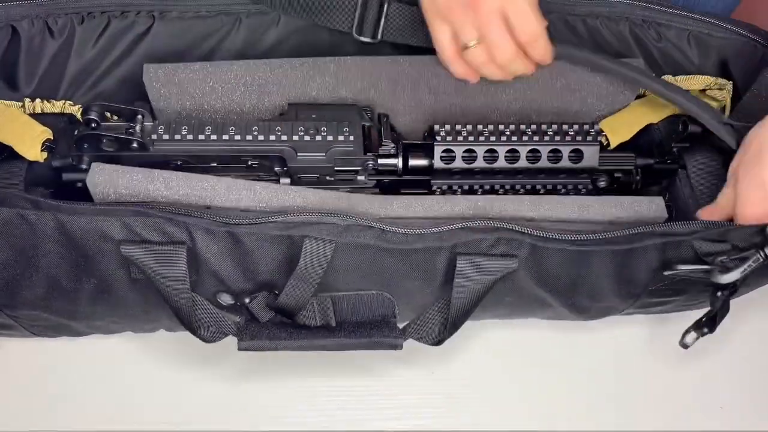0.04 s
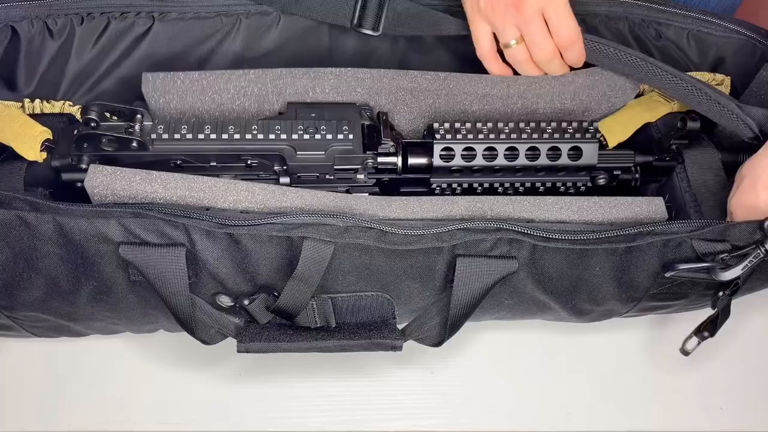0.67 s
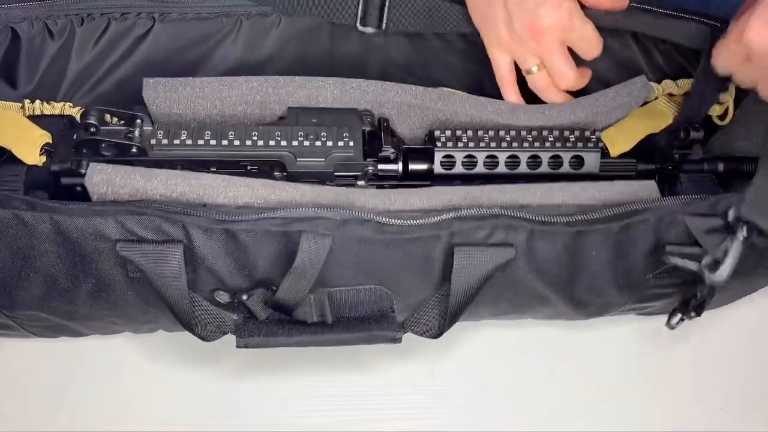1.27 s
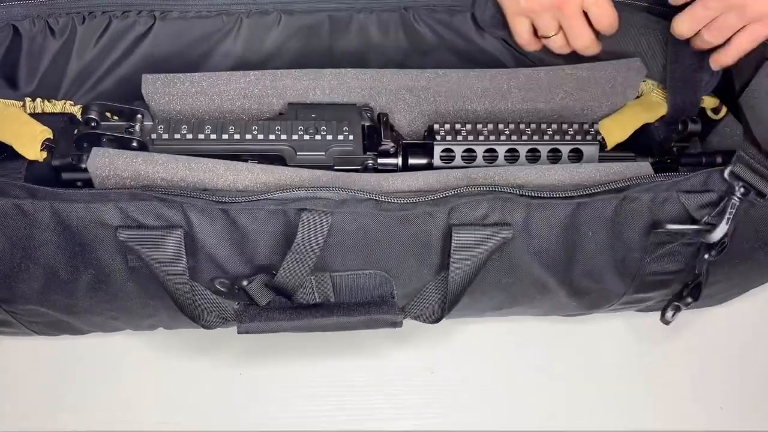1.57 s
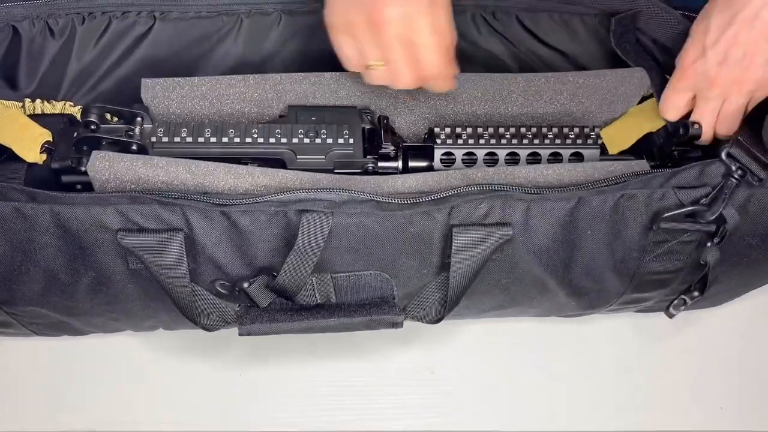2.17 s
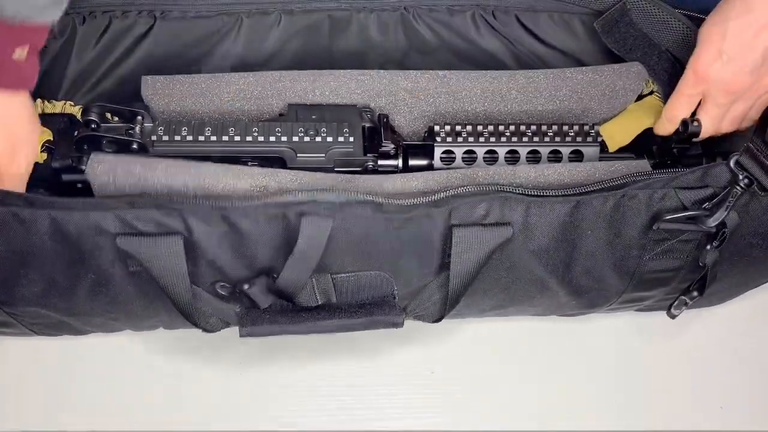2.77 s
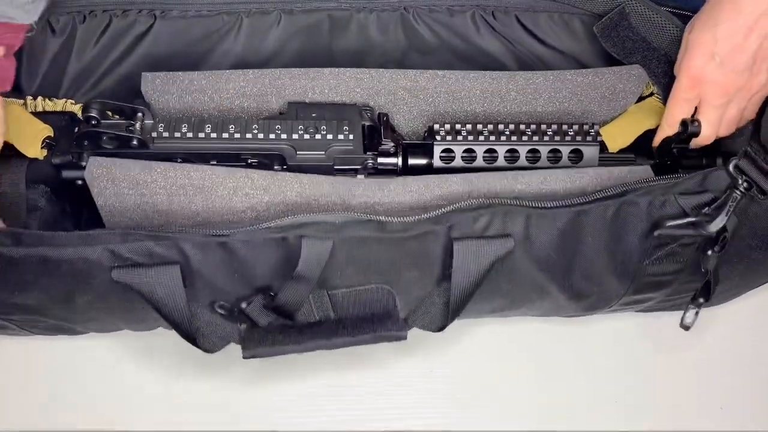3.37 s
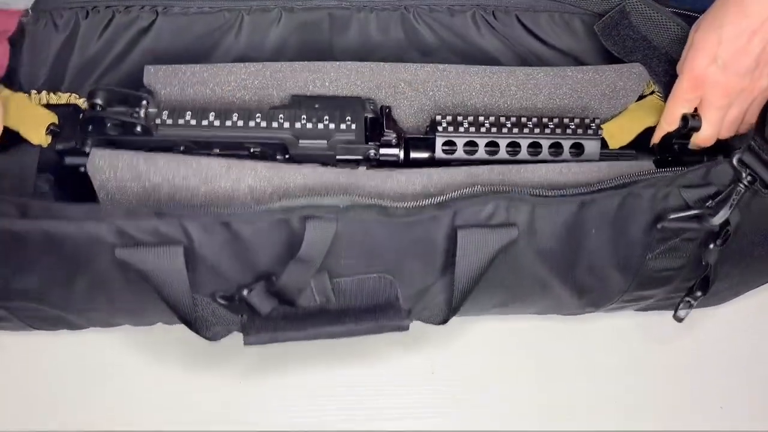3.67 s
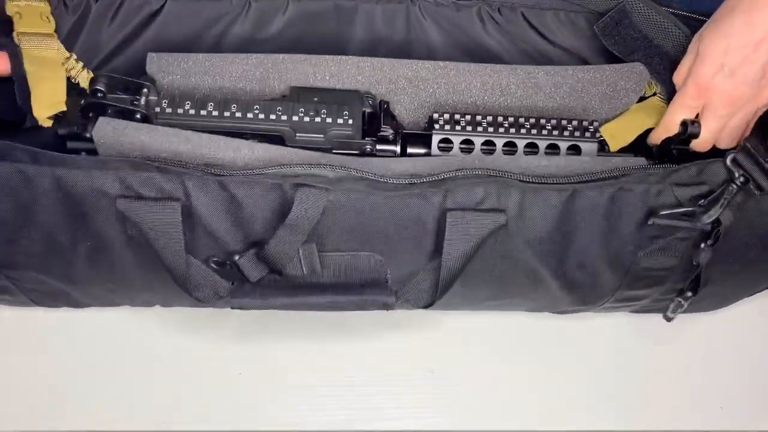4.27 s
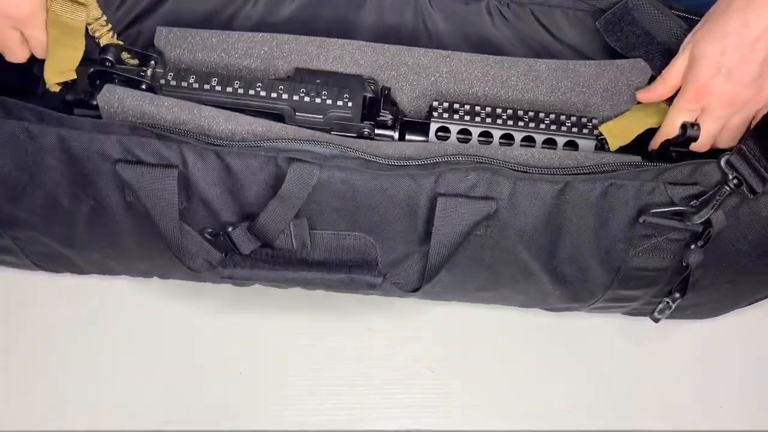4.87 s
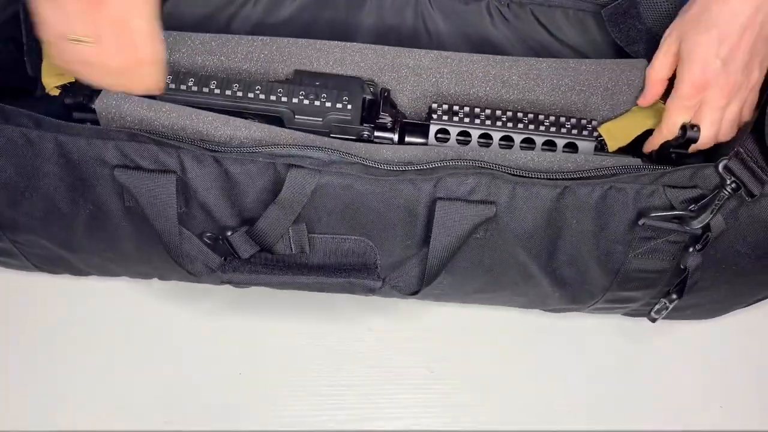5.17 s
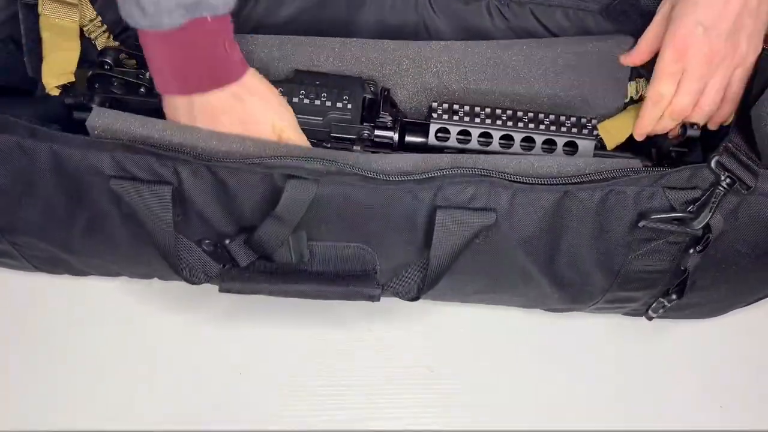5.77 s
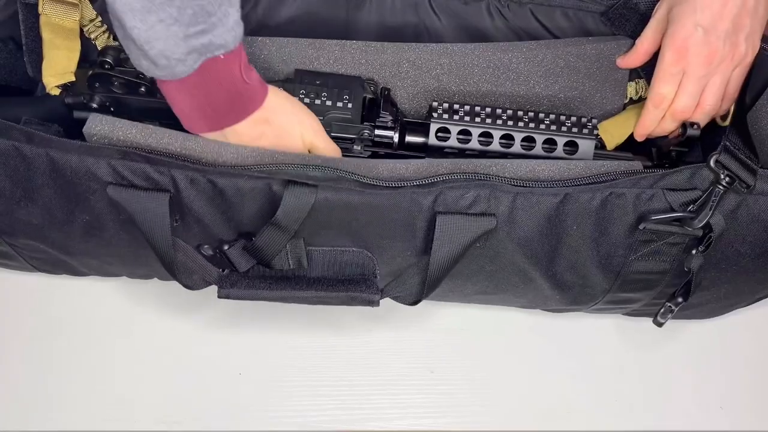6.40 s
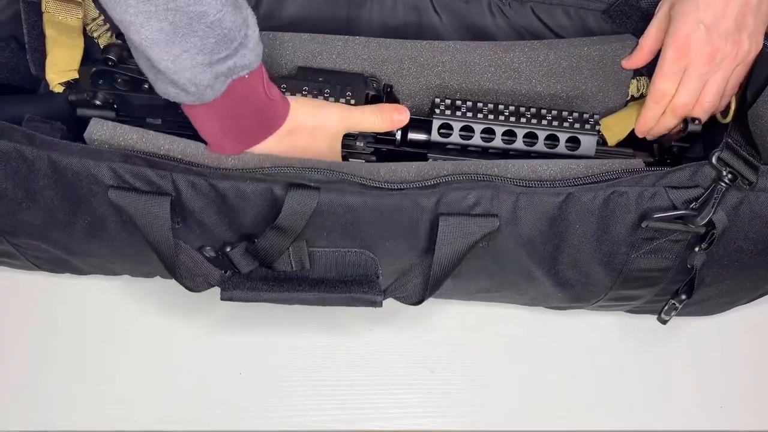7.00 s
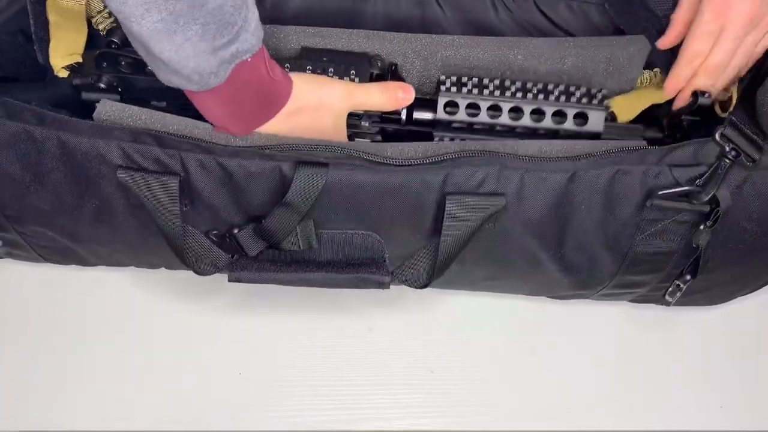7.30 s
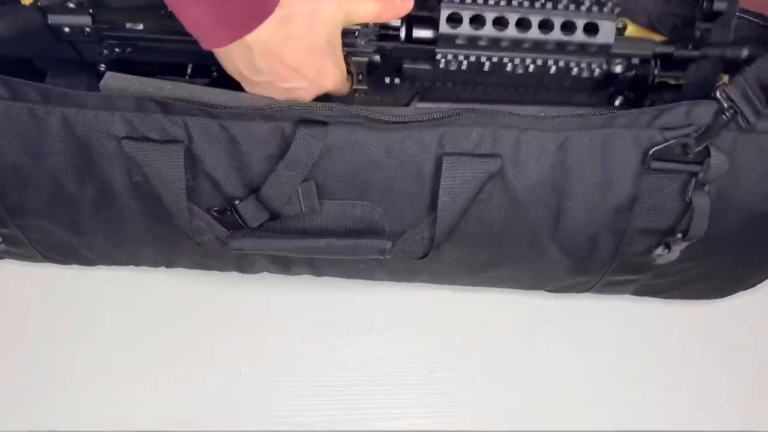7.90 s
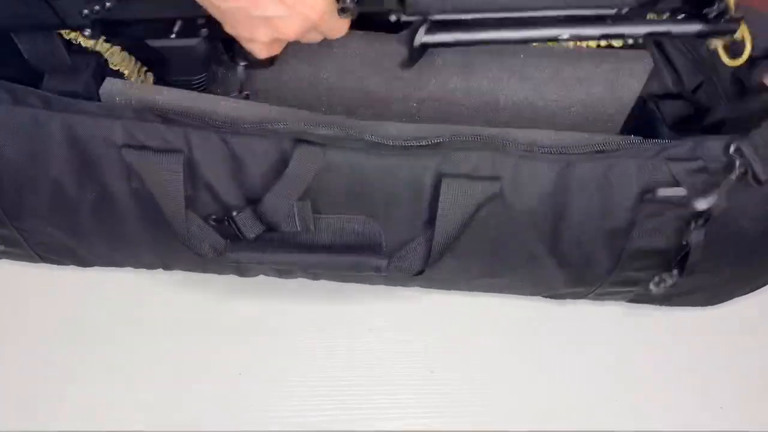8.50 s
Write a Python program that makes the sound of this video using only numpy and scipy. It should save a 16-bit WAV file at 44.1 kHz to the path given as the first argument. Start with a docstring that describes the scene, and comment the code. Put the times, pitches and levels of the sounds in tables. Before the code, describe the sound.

A hook-and-loop strap crackles and rips open inside a padded nylon bag. Hands rub over fabric and foam, and the bag thumps softly on a table. A second strap rips, trailing off in scattered snaps. Quieter rustling follows, then a heavy metal rifle knocks and scrapes as it slides out. The sound is close, in a small room with faint background hiss.

```python
"""Two hook-and-loop straps rip open on a padded nylon bag, close up on a table in a small room.
Swarms of hooks let go, plucking the taut tape and shaking the panel; stragglers snap one by one.
Around the rips, hands rub over nylon and foam, the bag thumps on the table, and a heavy metal item
knocks and slides out. Short reflections and the ring of the hollow bag sit behind, over faint room tone."""
import sys
import numpy as np
from scipy import signal
from scipy.fft import rfft, irfft, next_fast_len
from scipy.io import wavfile

SR = 44100
rng = np.random.default_rng(int(sys.argv[2]) if len(sys.argv) > 2 else 0)


def digitize_waveform(pressure):
    """Quantize a signal to 16-bit integers and store it at the path in sys.argv[1].

    Rows of a 2-D input are taken as channels; values are limited to [-1, 1].
    """
    field = np.atleast_2d(pressure).T
    bounded = np.clip(field, -1, 1)
    quanta = np.round(bounded * 32767).astype(np.int16)
    wavfile.write(sys.argv[1], SR, quanta)


N = 381465
T = np.arange(N) / SR

# Levels are fader settings ahead of each layer's trim and the master gain.
# EQ curves, each (frequency [Hz], gain [dB])
ROOM_TONE_EQ = [(25, -0.5), (60, 4.5), (250, -11), (1000, -25.5), (4000, -24), (16000, -18)]  # low rumble, faint hiss
PADDING_EQ = [(25, -38.5), (62, -9.5), (100, -9), (140, -5.5), (230, 2.5), (400, -3.5), (520, -11),
              (800, -38)]  # dull body of the foam
CLOTH_EQ = [(250, -18.5), (480, -14), (660, 0.5), (820, 1), (1000, 0), (1400, 0), (2100, -1.5),
            (2700, -10.5), (4500, -15)]  # midrange rustle
WEAVE_EQ = [(1200, -49), (2600, 1.5), (4000, 2), (5500, 6), (8000, 1), (11500, 4.5), (15500, 3.5)]  # fine hiss of threads
CRINKLE_EQ = [(1300, -27), (2400, 0), (3800, 4.5), (5000, -1.5), (7500, -13)]  # a snapping crease
TICK_EQ = [(3200, -54), (5400, 7.5), (6800, 7), (8200, 5), (11000, 11.5), (13000, 5), (15500, 8.5)]  # a single hook
PANEL_EQ = [(25, -34), (62, -4), (100, -18), (140, -1), (200, 4.5), (270, 9.5), (330, 4), (400, 6),
            (520, -22), (800, -39)]  # boom of the panel under a strap
TAPE_EQ = [(250, -12.5), (480, 2), (660, -3), (810, 2), (930, 1.5), (1250, 2.5), (1480, 3), (1750, 0.5),
           (2200, -1), (2700, -13), (4500, -8.5)]  # rasp of the stiff tape
HOOKS_EQ = [(1200, -27.5), (2600, -3), (3800, 2.5), (5600, 6.5), (7300, 2.5), (9000, 1.5), (11300, 5),
            (13000, 2.5), (15500, 3.5)]  # bright crackle of many hooks
# the hollow bag and the table ringing on: (frequency [Hz], level [dB], t60 [s])
HOLLOW_MODES = [(137.7, -5.5, 0.99), (260, -6, 0.1), (404.5, -1.5, 0.29), (819, 7.5, 0.23)]
# phase between the two microphone ports: (frequency [Hz], lead of the left [rad])
PORT_PHASE = [(0, 0), (1100, -.4), (2600, .6), (4700, 3.14), (17500, 22.0)]
# the padded bag bumping the table: (time [s], level [dB])
THUMP_CUES = [(0.837, -27), (1.816, -30), (2.01, -21.5), (2.503, -41), (3.138, -22), (3.437, -31),
              (3.612, -32.5), (5.271, -32), (6.042, -35.5), (6.62, -55), (7.345, -35), (7.4, -35),
              (7.612, -29), (7.815, -34), (7.908, -30), (7.961, -33), (8.031, -33), (8.12, -35),
              (8.21, -43), (8.26, -38), (8.334, -35), (8.438, -35), (8.54, -34)]
# buckles and the item hitting the padding and each other: (time [s], level [dB], brightness [Hz])
KNOCK_CUES = [(0.225, -16, 610), (0.556, -26.5, 324), (0.846, -18.5, 218), (1.112, -8.5, 335),
              (1.323, -8, 1310), (1.624, -17.5, 433), (1.66, -21, 292), (2.325, -24, 407), (2.78, -22, 715),
              (3.128, -23, 215), (3.208, -22.5, 243), (4.101, -33, 900), (4.122, -20, 297),
              (4.667, -15.5, 1040), (4.913, -29.5, 260), (5.266, -27, 435), (5.332, -30, 264),
              (5.628, -18, 1440), (5.698, -38, 1360), (5.994, -29.5, 1010), (6.538, -44.5, 1680),
              (7.348, -23.5, 300), (7.46, -32, 215), (7.583, -22.5, 544), (7.619, -24.5, 1230),
              (7.735, -24.5, 333), (7.813, -28, 205), (7.869, -25.5, 263), (7.874, -34, 1290),
              (7.96, -30.5, 254), (8.008, -26.5, 945), (8.05, -26.5, 237), (8.155, -21, 765),
              (8.202, -30.5, 242), (8.324, -28, 480), (8.459, -27, 305), (8.532, -29, 400)]
# ring of a knock: (frequency [Hz], level [dB], t60 [s])
HARDWARE_MODES = [(208.3, 1, 0.19), (277, 6, 0.086), (420, 3, 0.098), (646, 8, 0.032), (816, 3.5, 0.056),
                  (1007, 2.5, 0.1), (1256, -2, 0.06), (1412, 0, 0.063), (1900, 13.5, 0.02),
                  (2260, -11, 0.12)]
# a hand or the item stroking nylon and foam:
# (start [s], length [s], cloth level [dB], padding offset [dB], hiss offset [dB])
STROKE_CUES = [(-0.05, 0.076, -42, -1, 1.5), (0.025, 0.3, -41, -8.5, 1), (0.302, 0.51, -49, 0, 0.5),
               (0.468, 0.35, -46, -11, 5), (1.289, 0.23, -43, 1.5, 1), (1.53, 0.23, -36.5, -3.5, 6),
               (1.706, 0.27, -49.5, 0.5, 2), (1.952, 0.099, -48.5, 4.5, 4.5), (1.994, 0.25, -52, -4, -0.5),
               (2.189, 0.27, -48, -1.5, 0.5), (2.537, 0.066, -53, -3, -1), (2.635, 0.19, -47, -1.5, 6.5),
               (2.736, 0.11, -39.5, 0.5, -19), (2.799, 0.16, -47, -1, -1), (2.898, 0.41, -54.5, 1.5, -5),
               (3.097, 0.18, -39, -0.5, 4), (3.276, 0.27, -45.5, 1.5, 6), (3.454, 0.38, -36, -5, 10.5),
               (3.76, 0.23, -37.5, 5, 7.5), (3.913, 0.27, -44.5, 2, 6), (4.214, 0.021, -60, 8, 16.5),
               (4.296, 0.063, -53, 3, 10), (4.359, 0.35, -43.5, 1.5, 2), (4.581, 0.21, -40, 0, 1.5),
               (4.785, 0.23, -52, 0, 4), (4.938, 0.23, -57, -1, -10), (5.13, 0.5, -54, 3.5, -5),
               (5.303, 0.5, -49.5, -7, 3), (5.586, 0.21, -46.5, -9.5, -26), (5.72, 0.26, -55, 1, 1.5),
               (5.962, .15, -47, -3, -4.5), (6.123, 0.14, -52.5, -5.5, -5.5), (6.29, 0.16, -56, -1.5, -9.5),
               (6.668, 0.17, -55.5, -6, -4.5), (6.816, 0.19, -54, 4.5, -10.5),
               (7.005, 0.28, -47.5, 1.5, -16), (7.172, 0.36, -41.5, -1.5, 5.5),
               (7.385, 0.28, -45.5, -1, -4), (7.559, 0.12, -49, 3, 5.5), (7.674, 0.16, -48.5, 2.5, 0),
               (7.837, 0.15, -46, 0.5, 1.5), (7.913, 0.51, -42, 0, 0), (8.391, 0.19, -46, -1, -2),
               (8.532, 0.35, -44, -1.5, 1.5)]
# skin on smooth lining hisses finer than on coarse nylon: (time [s], top-octave gain [dB])
HISS_SHEEN = [(0, -3), (0.6, -3.5), (1.6, 0), (2.7, -2.5), (4.6, -3), (5.5, 8), (6.4, 13), (7.3, -0.5),
              (8.6, -5)]
# rubs through a fold or cupped hand: (start [s], length [s], level [dB], from [Hz], to [Hz])
POCKET_CUES = [(1.654, 0.079, -36, 690, 1060), (1.953, 0.042, -43, 720, 400), (6.809, 0.19, -51, 950, 1420),
               (6.975, 0.19, -50.5, 1470, 1200)]
# stretches where strained fabric ticks: (start [s], end [s], tick level [dB])
STRAIN_CUES = [(0.505, 0.7, -47), (2.2, 2.42, -41.5), (3.837, 4.15, -34), (4.349, 4.75, -44)]
# single hooks and creases snapping: (time [s], tick level [dB], crinkle offset [dB], tape offset [dB])
SNAP_CUES = [(0.2243, -37, 4.5, 10), (0.496, -30.5, -6, 4), (0.508, -28, -6, 5), (0.5181, -35.5, 4, 7),
             (0.522, -31, 6, 10), (0.5428, -28.5, -6, -5), (0.556, -28, -0.5, 7.5), (0.5615, -28, -2, 1),
             (0.587, -35, 3, 5), (0.6147, -29.5, -1, -1), (0.626, -43, -2, 13), (0.661, -32.5, -4, 8),
             (0.67, -39, -8, 7), (0.679, -34.5, -9, 4), (0.711, -37, -8, -7), (0.7459, -31, -1, 1.5),
             (0.75, -26, -1, -3), (0.7605, -23.5, -4, -2), (0.8234, -29.5, 1.5, 7), (0.925, -31.5, -6, 9),
             (0.943, -26, -6, 12.5), (0.9665, -27, -5, 9.5), (1.024, -25.5, 4, 11.5), (1.037, -21, 2, 6),
             (1.172, -27, -11, 7), (1.178, -26, -10, -3), (1.183, -15, -22, -9), (1.188, -23, -23, -6),
             (1.208, -16, -24, 3.5), (1.222, -24, -8, 0), (1.229, -20.5, -8, 1.5),
             (1.243, -15.5, -12.5, -4), (1.249, -10, -19, -0.5), (1.31, -18, -21, 2),
             (1.3638, -17.5, -15, -1), (1.367, -17.5, -13, -6), (1.3693, -17, -12, -3),
             (1.3738, -21, -15, -3), (1.391, -23.5, -5, 4), (1.4049, -23.5, -12, 3.5),
             (1.407, -34.5, -10, 0), (1.4583, -21, -20, -5), (1.4604, -27, -9, -7.5),
             (1.4943, -21, -11.5, -3), (2.326, -29, -21, 4.5), (2.379, -37, -5, 2.5),
             (2.5368, -44, -10, -5), (2.5454, -37, -13, -2), (2.5638, -38, -6, 1), (2.779, -35, 8.5, 12.5),
             (2.888, -38.5, 9.5, 4), (3.053, -38, 8, 7), (3.1665, -25, -4, -4), (3.169, -26, -11, 1.5),
             (3.205, -17.5, -8, -4), (3.2385, -28, -7, -8), (3.2857, -29, -6, -1.5), (3.4572, -21, -1, -4),
             (3.461, -28.5, 9, 2), (3.496, -29, -8, -3), (3.5065, -21, -3, 3), (3.509, -19.5, -8, -8.5),
             (3.529, -28.5, -8, -4), (3.551, -21.5, -3, -5), (3.839, -27, 0, 0.5), (3.8436, -25, 9, -0.5),
             (3.8905, -21, 0.5, -3), (3.8925, -23, 0, -5), (3.9857, -25, 1, -8), (4.0329, -30, 7, -4),
             (4.054, -29.5, 6, 0), (4.063, -25, -4, -27), (4.0997, -28.5, -23, 3), (4.107, -40.5, -14, -8),
             (4.1228, -25.5, -15, -4.5), (4.1435, -37.5, -14, -11), (4.3525, -44.5, 12, -9),
             (4.4, -31, 2.5, -5), (4.4038, -34.5, 4, 1), (4.4085, -28.5, 2, 0), (4.426, -30.5, 3, -19),
             (4.4384, -30, 3, -24), (4.4733, -35, 5, -15), (4.4896, -23.5, 0, -10), (4.5295, -37, 4, -12),
             (4.5325, -30.5, -1, -9), (4.618, -34, 3, -9), (4.651, -28, 2, -13), (4.6648, -31, -12, -9),
             (4.6673, -19.5, -14, 4.5), (4.7025, -29, -4, -5), (4.7058, -27.5, -4.5, 6),
             (4.72, -29, -3, -10), (4.7264, -26.5, -7, -18), (4.8088, -40, -6, -16),
             (4.8663, -37.5, -14, -8), (4.89, -39, -12, -3), (4.933, -35.5, -8, 0), (4.9813, -52, -14, -10),
             (5.043, -55, -10, -14), (5.084, -47.5, -5, -10), (5.142, -51, -15, -13),
             (5.1757, -55, -15, -10), (5.186, -46, -13, -5), (5.1947, -38, -22, -1),
             (6.599, -54.5, -12, -2.5), (7.1, -38, -29, -1.5), (8.0594, -33, -4, -13)]
# hooks dragging through loops: (time [s], level [dB], pitch [Hz], half-length [s])
SQUEAK_CUES = [(3.462, -23, 6920, 0.0053), (3.788, -15.5, 7300, 0.011)]
# resonances of the taut tape: (frequency [Hz], bandwidth [Hz], level [dB])
TAUT_MODES = [(810, 60, -6), (1270, 150, -6), (1462, 90, -5)]
# pulls on a strap:
# (start [s], length [s], tape level at full force [dB], crackle offset [dB], ring offset [dB])
PULL_CUES = [(0.753, 0.044, -39.5, 12.5, -1), (0.816, 0.31, -22.5, 3, -6.5),
             (1.029, 0.075, -24.5, -7, -4.5), (1.163, 0.044, -24, 2.5, -17), (1.2, 0.041, -25, 8, -9),
             (3.062, 0.055, -28.5, 4.5, -7), (3.593, 0.022, -24, 8.5, -5), (3.57, 0.23, -24, 4, -5.5),
             (3.783, 0.016, -19.5, -3.5, -9.5)]


def undb(db):
    """Decibels to gain."""
    return 10 ** (np.asarray(db) / 20)


def unit(x):
    """Scale to rms 1."""
    return x / np.sqrt(np.mean(x ** 2))


def add(track, start, sound):
    """Drop a sound onto a track at a time in seconds."""
    i = int(np.clip(start * SR, 0, N - 1))
    track[i:i + len(sound)] += sound[:N - i]


def butter(x, order, hz, kind):
    """Butterworth filter."""
    return signal.sosfilt(signal.butter(order, hz, kind, fs=SR, output="sos"), x)


def eq(x, curve, size=4096):
    """Minimum-phase EQ that keeps the power of white noise; falls 10 dB an octave past the curve's ends."""
    hz, db = np.transpose(curve)
    grid = np.maximum(np.arange(size // 2 + 1) * SR / size, 1)
    octaves_out = np.maximum(np.log2(grid / hz[-1]), 0) + np.maximum(np.log2(hz[0] / grid), 0)
    gain = undb(np.interp(np.log(grid), np.log(hz), db) - 10 * octaves_out)
    cepstrum = irfft(np.log(gain))
    cepstrum[1:size // 2] *= 2
    cepstrum[size // 2 + 1:] = 0
    response = irfft(np.exp(rfft(cepstrum)))
    return signal.oaconvolve(x, response / np.linalg.norm(response))[:len(x)]


def resonate(x, hz, width_hz):
    """A sweepable resonance that keeps the power of white noise."""
    turn = np.exp(2j * np.pi * np.cumsum(hz) / SR)
    pole = np.exp(-np.pi * width_hz / SR)
    return np.sqrt(2 * (1 - pole ** 2)) * np.real(turn * signal.lfilter([1], [1, -pole], x / turn))


def wander(rate_hz):
    """Random modulation with a spread near 1."""
    knots = rng.standard_normal(8192)
    return 1.2 * np.interp(T * rate_hz, np.arange(len(knots)), knots)


def fade(t60, length):
    """Exponential decay over a length in seconds."""
    return np.exp(-np.log(1000) * T[:int(length * SR)] / t60)


def grains(per_s, spread_db, t60):
    """Tiny noise bursts at random moments, most weak and a few strong; rms 1 at any density."""
    sizes = undb(spread_db * np.minimum(rng.exponential(size=N), 4))
    onsets = (rng.random(N) < per_s / SR) * sizes ** 2 / per_s
    power = np.abs(signal.oaconvolve(onsets, fade(t60, .03) ** 2)[:N])
    return unit(np.sqrt(power) * rng.standard_normal(N))


def room_tone():
    """Still indoor air: a faint bed of rumble and hiss."""
    return undb(-65) * eq(rng.standard_normal(N), ROOM_TONE_EQ)


def wash(x, t60, side_hz):
    """Dense stereo reflections, mono in the lows and wide above side_hz."""
    t = T[:SR // 3]
    tails = rng.standard_normal((2, len(t))) * undb(-60 * t / t60) * (1 - np.exp(-t / 0.0019))
    mid, side = tails / np.linalg.norm(tails, axis=1, keepdims=True) / np.sqrt(2)
    side = butter(side, 1, side_hz, "high")
    return np.array([signal.oaconvolve(x, tail)[:N] for tail in (mid + side, mid - side)])


def shifting_wash(x, t60, side_hz, turn_hz=3):
    """Hands and flaps move, so two patterns of reflections keep crossfading."""
    turn = 2 * np.pi * turn_hz * T + wander(12)
    return np.cos(turn) * wash(x, t60, side_hz) + np.sin(turn) * wash(x, t60, side_hz)


def room(x):
    """The table top throws back the mids, the walls add a faint wash, and the hollow bag rings on."""
    mids = butter(x, 2, [420, 3600], "band")
    table = undb(-4) * shifting_wash(mids, t60=.045, side_hz=150)
    walls = undb(-12) * shifting_wash(x, t60=.091, side_hz=200)
    t = T[:SR // 3]
    ring = sum(undb(db - 60 * t / t60) * np.cos(2 * np.pi * hz * t) for hz, db, t60 in HOLLOW_MODES)
    hollow = undb(-33) * signal.oaconvolve(x, ring / np.linalg.norm(ring))[:N]
    return table + walls + hollow


def mic_ports(x):
    """Stereo direct sound: the treble reaches the left port a fraction of a millisecond early."""
    size = next_fast_len(N + SR, True)
    hz = np.arange(size // 2 + 1) * SR / size
    lead = np.interp(hz, *np.transpose(PORT_PHASE))
    return irfft(rfft(x, size) * np.exp(.5j * np.outer([1, -1], lead)), size)[:, :N]


def bag_thumps(modes_hz=(82.5, 130.8), t60=0.09, attack_s=0.0049):
    """The soft bag pushes slowly on the table top, which answers with two low modes."""
    out, t = np.zeros(N), T[:SR // 4]
    envelope = undb(-60 * t / t60) * (1 - np.exp(-t / attack_s))
    for start, db in THUMP_CUES:
        low, high = 2 * np.pi * np.array(modes_hz) * (1 + 0.025 * rng.standard_normal(2))
        bump = (0.86 * np.sin(low * t) + np.sin(high * t)) * envelope
        add(out, start, undb(db - 8) * bump / np.abs(bump).max())
    return out


def hardware_knocks(focus_db=13.5, hard_hz=890, attack_cycles=0.4):
    """Hard parts clack and ring the modes near the blow's brightness; foam softens attack and scuff."""
    out, t = np.zeros(N), T[:int(.15 * SR)]
    for start, db, bright_hz in KNOCK_CUES:
        scatter = rng.standard_normal((len(HARDWARE_MODES), 2))
        ring = 0
        for (hz, mode_db, t60), (detune, phase) in zip(HARDWARE_MODES, scatter):
            octaves_off = max(np.log2(hz / bright_hz), -1)
            envelope = undb(mode_db - focus_db * octaves_off ** 2 - 60 * t / t60)
            ring += envelope * np.sin(2 * np.pi * hz * (1 + 0.046 * detune) * t + phase)
        rasp = eq(rng.standard_normal(len(t)) * undb(-60 * t / 0.045), CLOTH_EQ)
        scuff = 0.33 * min(bright_hz / hard_hz, 1) * unit(rasp)
        attack = 1 - np.exp(-t * bright_hz / attack_cycles)
        clack = 5.9 * np.sin(2 * np.pi * bright_hz * t) * np.exp(-bright_hz * t)
        blow = (unit(ring) + scuff) * attack + clack
        add(out, start, undb(db - 6) * blow / np.abs(blow).max())
    return out


def stroke_envelopes(overlap_s=0.022, skew=0.81, hiss_power=1.67):
    """Each stroke swells and fades with the speed of the hand: gains of cloth, padding and hiss."""
    settling = undb([-67.5, -65, -80])  # faint rustle between strokes
    cloth, padding, hiss = power = np.outer(settling ** 2, np.ones(N))
    for start, length, db, padding_db, hiss_db in STROKE_CUES:
        progress = (T - start + overlap_s) / (length + 2 * overlap_s)
        during = (progress > 0) & (progress < 1)
        speed = np.sin(np.pi * progress[during] ** skew)  # a skew under 1 peaks early
        cloth[during] += (undb(db) * speed) ** 2
        padding[during] += (undb(db + padding_db) * speed) ** 2
        hiss[during] += (undb(db + hiss_db) * speed ** hiss_power) ** 2
    return np.sqrt(power)


def nylon_rubs():
    """Threads catch and slip: a fine hiss on top, coarser creases, and the dull body of the padding."""
    cloth_gain, padding_gain, hiss_gain = stroke_envelopes()
    grip = undb(1.53 * wander(45))
    creases = grains(800, spread_db=1.5, t60=.042) * grip
    threads = grains(4000, spread_db=2.4, t60=.004) * grip
    cloth = undb(-0.5) * eq(creases * cloth_gain, CLOTH_EQ)
    padding = undb(0.13) * eq(creases * padding_gain, PADDING_EQ)
    hiss = undb(-0.1) * eq(threads * hiss_gain, WEAVE_EQ)
    sheen = undb(np.interp(T, *np.transpose(HISS_SHEEN)))
    hiss += (sheen - 1) * butter(hiss, 2, 7500, "high")
    return cloth + padding + hiss


def air_pockets(width_hz=400):
    """A pocket of air colours the rubbing; its resonance sweeps as it opens or closes."""
    out = np.zeros(N)
    friction = grains(1500, spread_db=1, t60=.01)
    for start, length, db, from_hz, to_hz in POCKET_CUES:
        progress = np.clip((T - start) / length, 0, 1)
        hz = from_hz + (to_hz - from_hz) * progress
        hollow = resonate(resonate(friction, hz, width_hz), hz, width_hz)
        out += undb(db) * np.sin(np.pi * progress) * unit(hollow)
    return out


def strain_ticks(per_s=11, crinkle_db=-12, tape_db=0.5):
    """Strained fabric ticks at random: extra cues in the columns of SNAP_CUES."""
    cues = []
    for start, end, db in STRAIN_CUES:
        slots = np.arange(start, end - 1 / per_s, 1 / per_s)
        for slot, lag in zip(slots, rng.random(size=64)):
            cues.append((slot + lag / per_s, db, crinkle_db, tape_db))
    return cues


def crack(ring_t60, ring_db, tail_t60, tail_db):
    """An instant spike, a short shiver and a tail, with the energy of 2 ms of unit noise."""
    decays = np.array([fade(ring_t60, .05), fade(tail_t60, .05)])
    ring, tail = rng.standard_normal(decays.shape) * decays
    sound = undb(ring_db) * ring / np.linalg.norm(ring) + undb(tail_db) * tail / np.linalg.norm(tail)
    sound[0] = 1
    return sound * np.sqrt(.002 * SR / np.sum(sound ** 2))


def snaps():
    """A hook or crease gives one dry tick; the stiff nylon and the plucked tape hang on a little longer."""
    tick, crinkle, pluck = np.zeros((3, N))
    for start, db, crinkle_db, tape_db in SNAP_CUES + strain_ticks():
        add(tick, start, undb(db) * crack(ring_t60=.004, ring_db=-1.5, tail_t60=.03, tail_db=-10))
        add(crinkle, start, undb(db + crinkle_db) * crack(.02, 10, .07, 9))
        add(pluck, start, undb(db + tape_db) * crack(.014, 4, .06, -2))
    return (undb(4) * eq(tick, TICK_EQ) + undb(-2.5) * eq(crinkle, CRINKLE_EQ)
            + undb(-3) * eq(pluck, TAPE_EQ))


def hook_squeaks(width_hz=950):
    """A dragging hook chatters in a narrow band for a moment."""
    out = np.zeros(N)
    for centre, db, hz, half_length in SQUEAK_CUES:
        chatter = butter(rng.standard_normal(N), 2, [hz - width_hz / 2, hz + width_hz / 2], "band")
        out += undb(db) * np.exp(-((T - centre) / half_length) ** 2) * unit(chatter)
    return out


def pull_envelopes(slack_db=10.5, build_power=1.89, grab_s=0.025, release_db_per_s=519):
    """Force builds, then collapses as the strap gives way: gains of tape, panel, crackle and ring."""
    power = np.zeros((4, N))
    for start, length, db, crackle_db, ring_db in PULL_CUES:
        to_go = np.clip(1 - (T - start) / length, 0, 1)
        force_db = -slack_db * to_go ** build_power
        grab = np.clip((T - start) / grab_s, 0, 1)
        release = undb(-release_db_per_s * np.maximum(T - start - length, 0))
        # each layer grows with force at its own slope, the panel fastest
        layers_db = np.array([force_db, 2.1 * force_db - 1,
                              crackle_db + 0.95 * force_db, ring_db + 1.2 * force_db])
        power += (grab * release * undb(db + layers_db)) ** 2
    return np.sqrt(power)


def strap_rips():
    """Hooks let go in bunches: they crackle, pluck the tape and shake its panel; the taut tape rings."""
    tape_gain, panel_gain, crackle_gain, ring_gain = pull_envelopes()
    hooks_per_s = 600 + 2000 * tape_gain / tape_gain.max()  # a harder pull frees more hooks
    bunches = undb(2 * wander(170))
    releases = unit(grains(hooks_per_s, spread_db=2.3, t60=.0035) * bunches)
    hooks = unit(grains(hooks_per_s, spread_db=2.4, t60=.0018) * bunches)
    jerks = unit(releases * undb(2.4 * wander(130)))  # the tape comes away in coarser jerks
    tuning = 1 + .025 * wander(16)  # pitch drifts as the peel line moves
    ring = sum(undb(db) * resonate(jerks * ring_gain, hz * tuning, width) for hz, width, db in TAUT_MODES)
    tape = undb(-3) * eq(jerks * tape_gain, TAPE_EQ)
    panel = eq(releases * panel_gain, PANEL_EQ)
    crackle = undb(2) * eq(hooks * crackle_gain, HOOKS_EQ)
    return tape + ring + panel + crackle


def scene():
    """The mix: straps and bag handling, direct and through the room, over room tone."""
    foley = (strap_rips() + hook_squeaks() + snaps() + nylon_rubs() + air_pockets()
             + hardware_knocks() + bag_thumps())
    return undb(-2.19) * (mic_ports(foley + room_tone()) + room(foley))


def record(dry, ceiling=0.75, low_cut_hz=42, high_cut_hz=15800):
    """Master chain: trim the sub-bass, soft-clip the peaks, cut the very top."""
    lean = butter(dry, 4, low_cut_hz, "high")
    rounded = ceiling * np.tanh(lean / ceiling)
    return signal.sosfilt(signal.ellip(8, .2, 70, high_cut_hz, fs=SR, output="sos"), rounded)


dry = scene()
out = record(dry)
digitize_waveform(out)
```